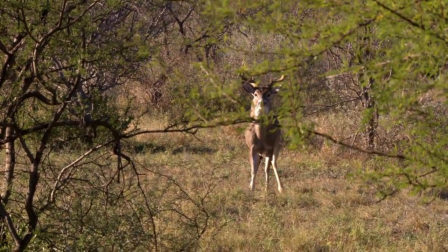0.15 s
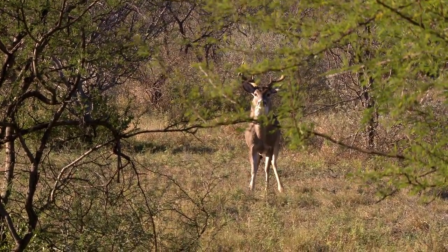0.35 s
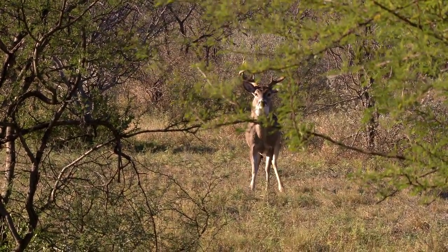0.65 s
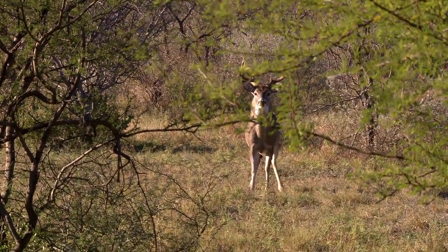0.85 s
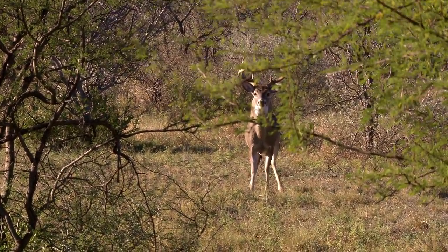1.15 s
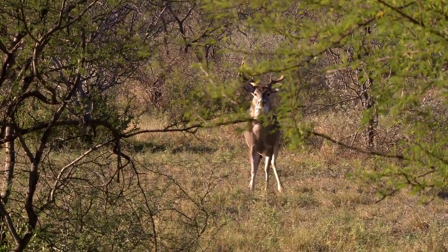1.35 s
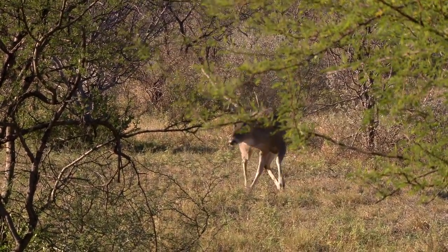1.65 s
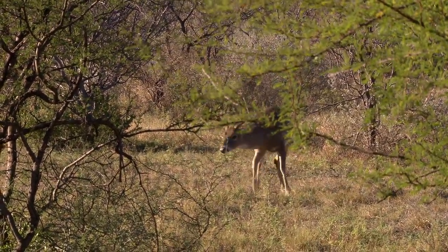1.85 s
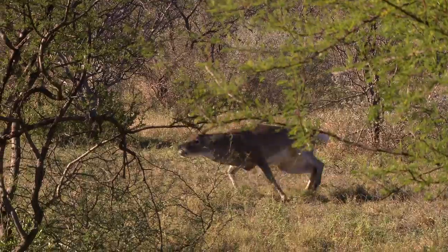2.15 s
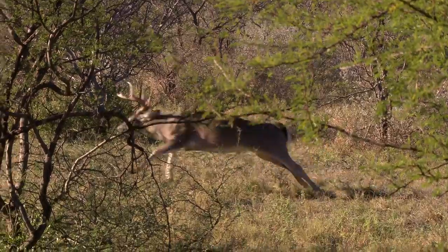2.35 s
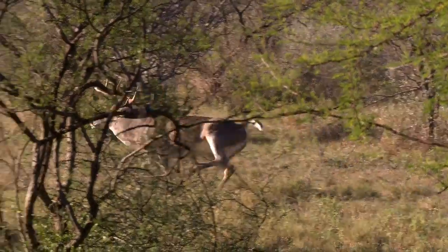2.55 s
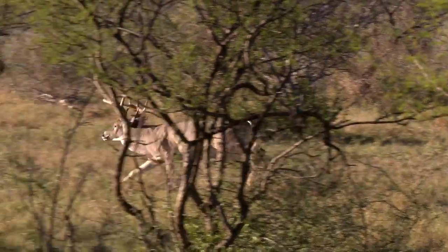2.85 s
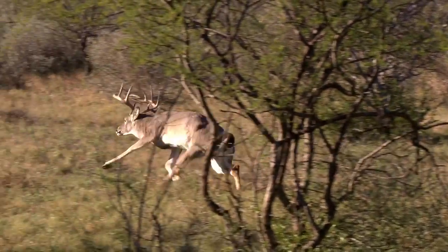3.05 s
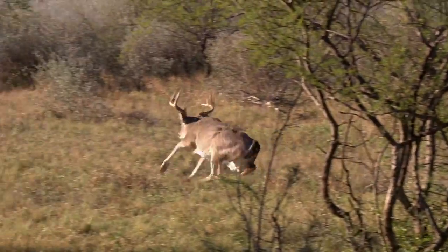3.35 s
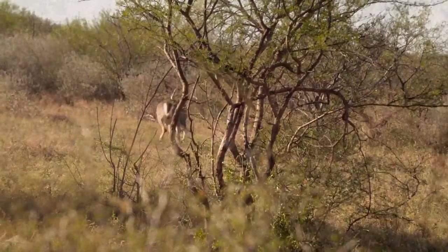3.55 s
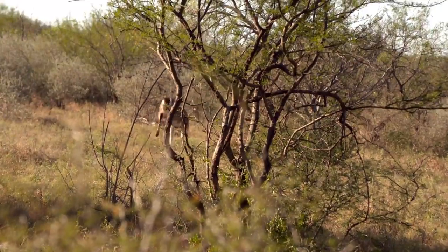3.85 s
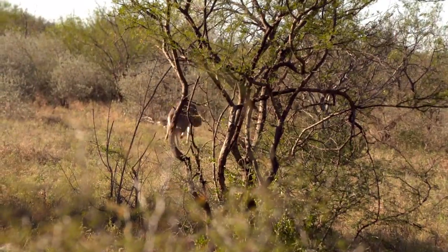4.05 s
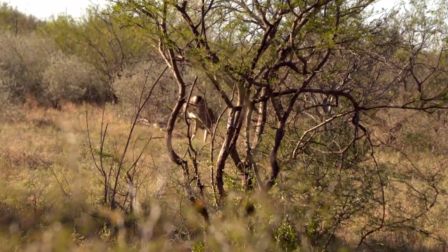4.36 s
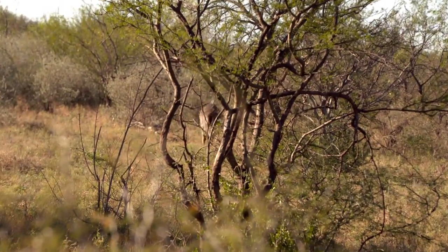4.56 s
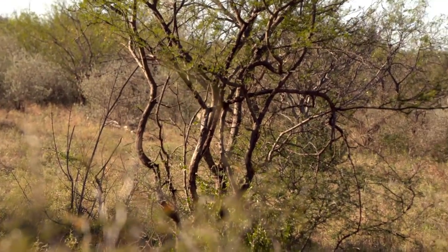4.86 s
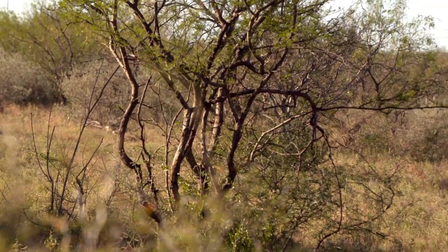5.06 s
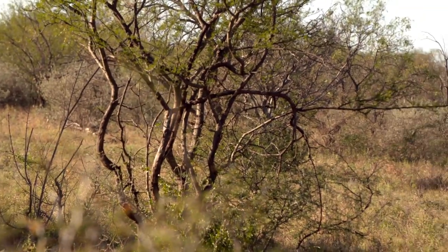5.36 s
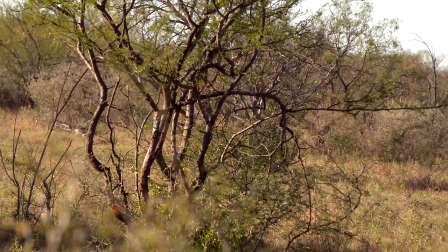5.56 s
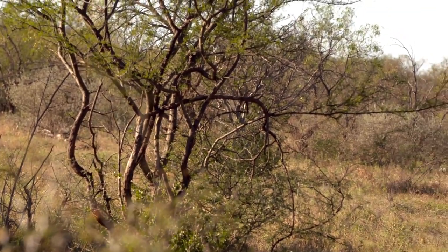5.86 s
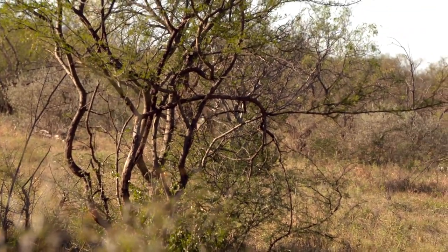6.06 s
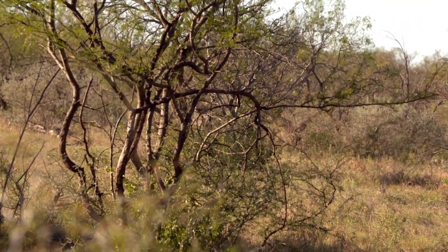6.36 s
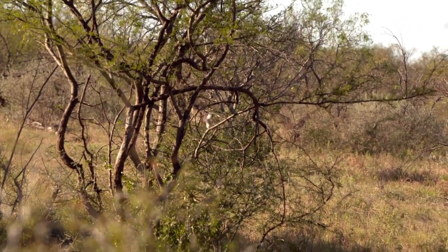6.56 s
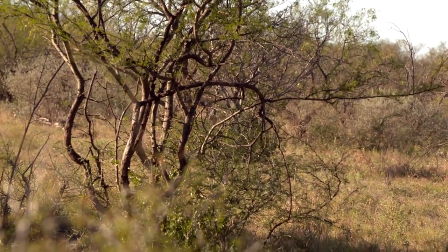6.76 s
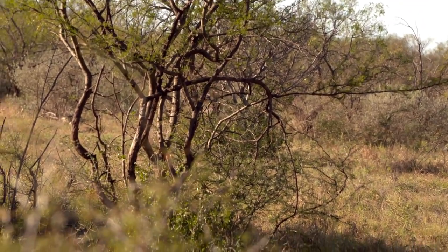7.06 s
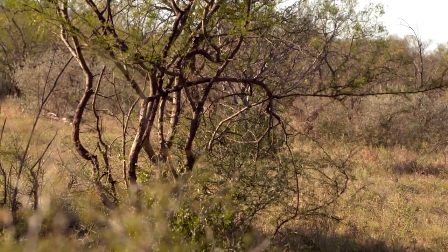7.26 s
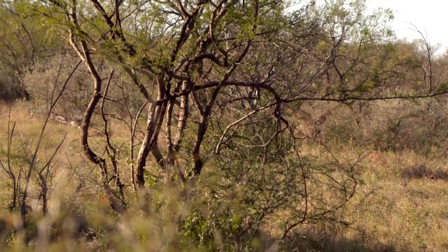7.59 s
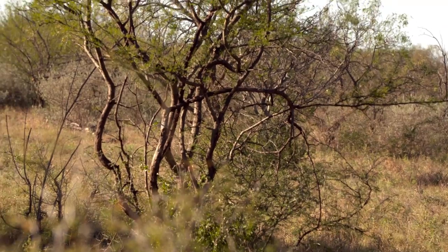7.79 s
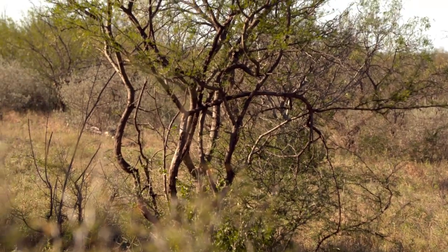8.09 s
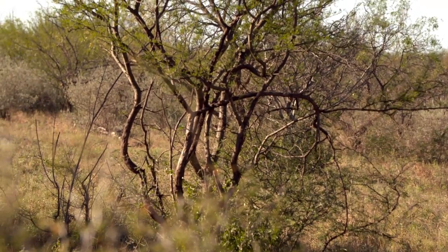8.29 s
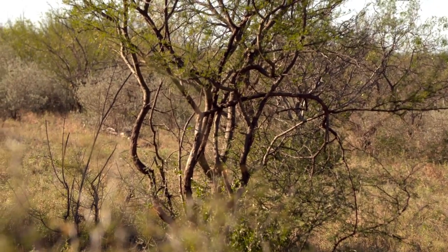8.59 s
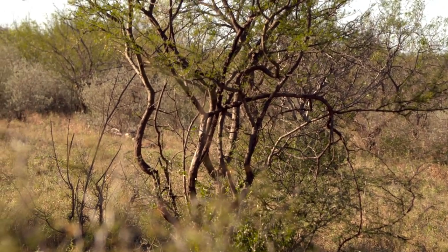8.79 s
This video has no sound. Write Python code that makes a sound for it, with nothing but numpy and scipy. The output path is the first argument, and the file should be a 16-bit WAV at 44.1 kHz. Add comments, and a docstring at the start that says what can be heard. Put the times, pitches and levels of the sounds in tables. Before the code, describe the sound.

Outdoors in quiet brush country, antler tines clack together several times a second, some strokes bright and clicking, others lower and woody, with the hardest slightly overloading the microphone. An early pop and momentary gap lead into a rushing, thudding brush of twigs that quickly dies away. More uneven clatter and small rubs follow, with faint wind and grass beneath.

```python
"""A pair of antlers is rattled by hand close to a microphone in dry brush, over faint wind and rustling grass.
The opening 0.435 s is a copy of knocks heard again from 4.6 s; a short splice joins it to the rattling.
At 1.39 s the signal drops out with a pop; as it returns, a thumping swipe through the brush dies away.
Until 8.9 s tines knock, chatter and scrape: impulses and slips excite decaying modes, some knocks leave
a beam humming, and the hardest overload the input. Shaped noise makes the swipe, wind and grass."""
import sys
import numpy as np
from scipy import signal
from scipy.io import wavfile
from scipy.ndimage import uniform_filter1d

SR = 44100
rng = np.random.default_rng(int(sys.argv[2]) if len(sys.argv) > 2 else 0)


def generate_wav(signal):
    """Clip the signal to [-1, 1] and save it as 16-bit WAV at the path in sys.argv[1]."""
    frames = np.transpose(np.atleast_2d(signal))
    scaled = np.clip(frames, -1, 1) * 32767
    pcm = np.round(scaled).astype(np.int16)
    wavfile.write(sys.argv[1], SR, pcm)


N = 393813

DROP_S, BACK_S = 1.3864, 1.451  # the signal is lost between these times


def gain_of(db):
    """Level in dB as an amplitude ratio: 20 dB is a factor of ten."""
    return 10 ** (np.asarray(db) / 20)


def evened(x):
    """Normalization to unit root-mean-square."""
    return x / np.sqrt(np.mean(x ** 2) + 1e-20)


def read(points, hz):
    """Interpolation of a spectral curve along a logarithmic frequency axis."""
    f, value = np.transpose(points)
    return np.interp(np.log(hz + 1), np.log(f + 1), value)


def add(mix, s, sound):
    """Superposition of a sound on the mix from time s."""
    part = mix[round(s * SR):][:len(sound)]
    part += sound[:len(part)]


def noise(colour, patchy_db, flicker_db):
    """Random-phase spectral synthesis: coloured noise with drifting patches and a flicker shared by all bands."""
    frames, hz = N // 128 + 5, np.fft.rfftfreq(512, 1 / SR)
    real, imaginary, patches = rng.standard_normal((frames, 257, 3)).T
    patches = uniform_filter1d(patches, size=8, axis=0)  # over frequency
    patches = evened(uniform_filter1d(patches, size=16, axis=1))  # over time
    flicker = evened(uniform_filter1d(rng.standard_normal(frames), size=3))
    level_db = patchy_db * patches + flicker_db * flicker
    spectrum = (real + 1j * imaginary) * gain_of(read(colour, hz)[:, None] + level_db)
    return evened(signal.istft(spectrum, nperseg=512, noverlap=384)[1][:N])


def knocks(first_contact=1.3, softness=.55, crack_size=24):
    """Impact excitation: a firm first contact and a few milliseconds of chatter drive the antler modes."""
    # each knock of tine on tine: t/s, level/dB over its first 6 ms, treble tilt/(dB per octave), favoured ring f/Hz
    blows = [(0.62, -25, 2.5, 3470), (.631, -16.5, 1.5, 2030), (.652, -33, -5, 1310), (.663, -39, -2, 1030),
             (.683, -25.5, 3.5, 2540), (.748, -46.5, -9, 1540), (.807, -38.5, 0, 1750),
             (.816, -36, -2, 2340), (.859, -60, -11, 2870), (.888, -50, -5, 1910), (1.021, -20.5, 1, 3150),
             (1.031, -30, -4, 2570), (1.052, -39, 1, 1190), (1.072, -28.5, -2.5, 2700),
             (1.123, -31, 3, 2300), (1.163, -34.5, 1.5, 3600), (1.325, -35.5, 0, 1403),
             (1.332, -18.5, 3.5, 2220), (1.376, -42, -6.5, 1270), (1.578, -26.5, 1, 3280),
             (1.604, -26.5, 2.5, 1100), (1.614, -20, 3, 1350), (1.641, -42.5, -1, 1030),
             (1.787, -52, -7, 1810), (1.84, -33.5, 6, 1797), (1.896, -33, 1.5, 1340), (1.911, -18, 2, 1410),
             (2.174, -20.5, 4.5, 2085), (2.186, -25, -1.5, 1540), (2.208, -31.5, 2, 1510),
             (2.231, -45, -5.5, 1680), (2.325, -58, 9, 3150), (2.346, -43, 1.5, 1810),
             (2.359, -46.5, 7.5, 4930), (2.428, -21, 5, 3030), (2.468, -15, 3.5, 1930),
             (2.49, -29, -4, 1290), (2.495, -35, -5, 1190), (2.525, -47.5, -8, 1680),
             (2.575, -55.5, -1.5, 1560), (2.587, -52.5, -8, 1870), (2.701, -28, 5, 2820),
             (2.705, -21.5, 6.5, 2950), (2.715, -17.5, 6, 1370), (2.743, -36.5, 12, 1560),
             (2.984, -42.5, 1.5, 960), (3.003, -32, -2.5, 1530), (3.013, -18.5, -0.5, 1860),
             (3.029, -35, 2, 1700), (3.255, -24, 4, 980), (3.297, -21, 2, 1540), (3.309, -25.5, -0.5, 1220),
             (3.536, -40.5, 0, 3550), (3.744, -19.5, 2.5, 3260), (3.769, -16.5, 0, 3170),
             (3.802, -35.5, 0.5, 2300), (3.968, -28.5, 2.5, 1130), (3.98, -33.5, 2.5, 1330),
             (4.03, -27, 1.5, 1270), (4.051, -47, 8, 1180), (4.084, -30, 7.5, 2870), (4.099, -21, 4, 2030),
             (4.202, -37.5, 0, 3280), (4.334, -29, 2, 3330), (4.351, -21, 4, 2180),
             (4.36, -28.5, -2.5, 1830), (4.393, -41.5, -3.5, 2420), (4.445, -53.5, -4.5, 1407),
             (4.564, -35, 0, 3460), (4.586, -24.5, 5, 3360), (4.601, -26, -5.5, 3300), (4.61, -31, 0, 1310),
             (4.624, -24.5, 0.5, 1500), (4.647, -27.5, -3.5, 3260), (4.683, -36, 0, 1630),
             (4.7, -32.5, 3, 2620), (4.724, -49, 0, 3400), (4.738, -51, 10, 3380), (4.763, -32.5, 4, 3200),
             (4.869, -30, 8, 1200), (4.899, -22.5, 9.5, 3000), (4.908, -20.5, -2.5, 1380),
             (4.918, -21, 2.5, 1550), (4.946, -31, -3.5, 1180), (4.96, -43.5, -16, 1270),
             (4.992, -51, 3, 1180), (5.018, -38.5, -4.5, 1500), (5.226, -43, -1.5, 1460),
             (5.249, -24, 2, 4230), (5.287, -23.5, 2, 2430), (5.326, -36, -1.5, 3350),
             (5.345, -44.5, 1.5, 2250), (5.467, -26.5, 3, 5500), (5.483, -22, 1.5, 1890),
             (5.497, -30, -1, 1510), (5.509, -31.5, 1.5, 1480), (5.565, -53.5, -3, 1210),
             (5.598, -38.5, -2, 3250), (5.725, -21.5, 8.5, 3060), (5.739, -21.5, 3, 1800),
             (5.754, -31.5, -2, 1590), (5.816, -40, 1, 1390), (5.857, -45.5, 2.5, 3900),
             (5.903, -37.5, 3, 3460), (6.001, -33, 7, 3640), (6.016, -36.5, 5, 3940),
             (6.024, -24.5, 6.5, 4200), (6.147, -61, 6, 960), (6.339, -26, 2, 1000),
             (6.362, -21.5, -.5, 3300), (6.39, -41, -3.5, 1190), (6.457, -45, -1, 2450),
             (6.647, -29.5, 2.5, 2860), (6.659, -33.5, 2.5, 2660), (6.677, -33.5, 4, 1200),
             (6.685, -27, 1, 4030), (6.693, -23, 1, 1100), (6.718, -40.5, -1, 1070), (6.728, -37, -2, 3420),
             (6.864, -57.5, -5, 1215), (6.926, -33.5, 2.5, 3400), (6.95, -42.5, -1.5, 3100),
             (7.05, -27.5, 5, 4170), (7.063, -28, 3, 3660), (7.086, -35, 3.5, 2720),
             (7.111, -27.5, 6.5, 1080), (7.119, -21.5, 0, 2950), (7.197, -36.5, 0.5, 3300),
             (7.252, -35.5, -1, 2800), (7.293, -63, -6, 1420), (7.315, -59.5, -2, 1460),
             (7.402, -31, 7.5, 3900), (7.42, -27.5, 3.5, 3680), (7.428, -28, 1, 1660),
             (7.442, -22.5, 1, 1240), (7.478, -45, 0, 1870), (7.554, -55.5, -3, 1530),
             (7.618, -33.5, -1.5, 3270), (7.693, -31, -4, 960), (7.716, -36, 0, 1480),
             (7.759, -42.5, 5.5, 2960), (7.768, -39, 0, 2890), (7.781, -23.5, 2, 3650),
             (7.791, -31.5, -10, 1480), (7.872, -44.5, -7.5, 2180), (7.902, -26.5, 4, 1270),
             (8.067, -21.5, 2, 4040), (8.092, -21, 0.5, 2950), (8.114, -33.5, 4, 1490),
             (8.131, -41, -5, 1200), (8.174, -34, -1.5, 2530), (8.218, -41.5, 10.5, 2840),
             (8.291, -35, 5.5, 2470), (8.33, -27.5, 5.5, 3500), (8.367, -31.5, -1, 3500),
             (8.373, -24, 4, 1670), (8.398, -36, -1, 1490), (8.41, -43.5, -7, 1510),
             (8.463, -28.5, 4, 3700), (8.522, -46.5, -4, 3570), (8.688, -25, 2, 3160),
             (8.804, -21.5, 6.5, 3970), (8.824, -28, 6, 3530), (8.833, -24, 4, 3100),
             (8.92, -54.5, -4, 1510)]
    times, levels_db, bright, ring_hz = np.transpose(blows)
    # the decay time constant of the chatter grows for knocks harder than firm
    chatter_ms, chatter_ms_per_db, firm_db = 3.48, 0.31, -26.5
    decay_ms = chatter_ms + chatter_ms_per_db * np.maximum(levels_db - firm_db, 0)
    contact = rng.standard_normal((len(times), 1200))
    ms = 1000 * np.arange(contact.shape[1]) / SR
    bounces = contact ** 3 / 4 * np.exp(-ms / np.maximum(decay_ms, .05)[:, None])  # the cube makes them sparse
    bounces = signal.lfilter([1 - softness], [1, -softness], bounces)  # later contacts are softer, so duller
    bounces[:, :crack_size] += first_contact * contact[:, -crack_size:]  # the first one cracks
    sounds = signal.fftconvolve(rings(bright, ring_hz), bounces, axes=1)
    out = np.zeros(N)
    for s, db, sound in zip(times, levels_db, sounds):
        onset_rms = np.sqrt(np.mean(sound[:260] ** 2))  # first 6 ms
        add(out, s, gain_of(db) * sound / onset_rms)
    return out


def rings(bright, ring_hz, spread_db=3.0, small_db=-4.0, place_db=9.5, place_octaves=0.1, grip_db_per_s=402.0):
    """Modal superposition: all blows share the same modes, and the place of each blow sets their mix."""
    # main modes of the antlers: f/Hz, relative level/dB, t60/s before the grip damps them
    main_modes = [(405.5, -13, 0.16), (1009.5, -1, 0.1), (1211.4, -2.5, 0.082), (1267, -4, 0.063),
                  (1504.6, 0.5, 0.077), (1620, -7, .07), (2255, -2.5, 0.059), (2340, -9, 0.032),
                  (2870, -21.5, 0.022), (3271, -1, 0.043), (3480, -6, 0.053), (3870, -3, 0.029),
                  (4040, -13.5, 0.041), (5430, -8.5, 0.034), (6900, -12, 0.047), (11160, -21.5, 0.03)]
    # crowd of small modes between them: f/Hz, relative level/dB
    small_levels = [(250, -43), (680, -21.5), (1140, -7.5), (2000, -4), (3250, -4), (5800, -5.5),
                    (8300, -12.5), (12800, -10), (16500, -33.5)]
    # decay of the small modes: f/Hz, t60/s before the grip damps them
    small_decays = [(300, 0.16), (1200, 0.064), (3500, 0.029), (7000, 0.011), (16000, 0.01)]
    main_hz, main_db, main_t60 = np.transpose(main_modes)
    small_hz = np.geomspace(small_levels[0][0], small_levels[-1][0], num=240) * rng.uniform(1.0, 1.01, size=240)
    hz = np.r_[main_hz, small_hz]
    base_db = np.r_[main_db, read(small_levels, small_hz) + small_db]
    t60 = np.r_[main_t60, read(small_decays, small_hz)]
    t = np.arange(6000) / SR
    decay = gain_of(-60 * t / t60[:, None])
    fade = np.cos(np.pi / 2 * t / t[-1])
    modes = decay * np.sin(2 * np.pi * hz[:, None] * t) * fade
    size, sign = rng.standard_normal((len(bright), len(hz), 2)).T
    # a hard glancing blow tips the mix to the treble; modes near the struck tine's pitch stand out
    tilt_db = bright * np.clip(np.log2(hz[:, None] / 2800), -1.2, 1.5)
    struck_db = place_db * np.exp(-.5 * (np.log2(hz[:, None] / ring_hz) / place_octaves) ** 2)
    mode_gain = np.sign(sign) * gain_of(base_db[:, None] + tilt_db + struck_db + spread_db * size)
    ringing = mode_gain.T @ modes
    ringing *= 1 + 1.4 * np.exp(-t / 0.0022)  # the blow itself is heard before the ring settles
    # the hands grip more or less tightly and damp the ring
    grip = rng.random((len(bright), 1)) ** 2
    return ringing * gain_of(-grip_db_per_s * grip * t)


def rubs(slips_per_s=1100, grit_db=4, places=3):
    """Stick-slip friction: grinding tines slip in dense tiny ticks that ring the antlers from a sliding contact."""
    # tines grinding along each other: start t/s, length t/s between edges, first level/dB, last level/dB,
    # favoured ring f/Hz
    strokes = [(0.715, 0.051, -57, -58, 1500), (.815, 0.096, -54, -57, 3160),
               (1.046, 0.042, -50.5, -42, 1300), (2.501, 0.051, -54, -75, 1515),
               (2.751, 0.074, -56, -58, 1596), (5.039, 0.082, -66, -61.5, 3360),
               (5.198, 0.054, -59, -46, 3200), (4.699, 0.04, -50, -52.5, 3360),
               (7.701, .185, -43, -68.5, 1370), (8.474, 0.043, -45.5, -53, 1500),
               (8.537, 0.095, -41.5, -56.5, 2450)]
    edge_s = .012  # a stroke sets in before its start and lifts off after its end this fast
    pressure_db, slide_s = 2.5, .02  # rms wavering of pressure; time before the contact slides to the next place
    size_db = grit_db * np.minimum(rng.exponential(size=N), 3.5)
    size_db += pressure_db * evened(uniform_filter1d(rng.standard_normal(N), size=500))
    slipping = rng.random(N) < slips_per_s / SR
    slips = evened(rng.choice([-1., 1.], N) * gain_of(size_db) * slipping)
    ring_hz = np.repeat(np.array(strokes)[:, -1], places)
    bodies = rings(np.full(len(ring_hz), -4.5), ring_hz, spread_db=3.5, small_db=2.0)
    bodies = bodies.reshape(len(strokes), places, -1)
    t, out = np.arange(N) / SR, np.zeros(N)
    place = (t // slide_s) % places
    for (s, length, first_db, last_db, _), body in zip(strokes, bodies):
        touch = np.clip(np.minimum(t - s, s + length - t) / edge_s + 1, 0, 1)
        drive = slips * touch * gain_of(np.interp(t, [s, s + length], [first_db, last_db]))
        for k in range(places):
            response = body[k] / np.linalg.norm(body[k])
            out += signal.oaconvolve(drive * (place == k), response)[:N]
    return out


def hums(t60=0.4):
    """Free damped vibration: the thick beams ring on at a low pitch."""
    # knocks that leave a main beam humming: t/s, level/dB ahead of the gradual onset, beam f/Hz
    beams = [(.63, -57, 354.4), (1.91, -55, 549), (2.174, -65, 362), (3.013, -59.5, 547), (3.3, -68.5, 554),
             (4.349, -53.5, 354), (4.765, -60, 351), (5.017, -66.5, 363), (6.927, -57, 562),
             (7.618, -65, 360), (7.903, -53, 544)]
    out, t = np.zeros(N), np.arange(14000) / SR
    for s, db, hz in beams:
        onset = 1 - np.exp(-t / 0.0036)
        add(out, s, gain_of(db - 60 * t / t60) * np.sin(2 * np.pi * hz * t) * onset)
    return out


def stroke(rows):
    """Amplitude modulation: the smoothed gain curve of one stroke, at -140 dB outside it."""
    s, db = np.transpose(rows)
    return uniform_filter1d(gain_of(np.interp(np.arange(N) / SR, s, db, -140, -140)), size=100)


def swipe():
    """Dense random contacts: a rush of twigs and leaves as enveloped, coloured noise."""
    # a swipe through the brush that dies away: t/s, level/dB
    envelope = [(1.45, -40.5), (1.485, -32.5), (1.497, -25.5), (1.515, -40.5), (1.55, -42.5), (1.6, -50),
                (1.65, -47.5), (1.67, -55.5), (1.95, -75.5)]
    # its colour: f/Hz, relative level/dB per Hz
    colour = [(35, -45), (60, -37), (164, -15.5), (682, -7), (1090, -4), (1860, -7.5), (2840, -9),
              (12700, -38.5), (16000, -39)]
    return stroke(envelope) * noise(colour, patchy_db=1.2, flicker_db=2.2)


def thumps():
    """Heavily damped oscillation: a few dull cycles for each push."""
    # low pushes inside the swipe: t/s, starting level/dB, f/Hz
    pushes = [(1.492, -26, 186), (1.498, -20, 265)]
    out, t = np.zeros(N), np.arange(1500) / SR
    for s, db, hz in pushes:
        add(out, s, gain_of(db - 60 * t / 0.022) * np.sin(2 * np.pi * hz * t))
    return out


def brush(x, t60=0.12):
    """Multiple scattering: weak echoes from stems and ground as a sparse decaying impulse response."""
    t = np.arange(8000) / SR
    sparse = rng.random(len(t)) < .05
    taps = rng.standard_normal(len(t)) * sparse * gain_of(-60 * t / t60) * (t > .004)
    taps = signal.lfilter([1], [1, -.6], taps)  # dulls the echoes
    return signal.oaconvolve(x, taps / np.linalg.norm(taps))[:N]


def air():
    """Broadband random sources: low rumble of wind and swipe, and dry rustle that loses its top when faint."""
    # t/s, low rumble level/dB: wind, and from 1.39 to 1.96 s the low part of the swipe,
    # dry rustle level/dB before its top is lost
    levels = [(.45, -79, -78), (0.972, -80, -84), (1.391, -75, -88), (1.51, -40.5, -56),
              (1.79, -62.5, -94.5), (1.961, -72, -76.5), (2.59, -71.5, -75.5), (3.031, -78, -80.5),
              (3.8, -78, -84), (4.85, -77, -84.5), (5.172, -63.5, -71.5), (5.59, -69, -76),
              (5.89, -52.5, -61.5), (6.12, -59, -69), (7.51, -67, -76), (8.129, -61.5, -71.5),
              (8.93, -61, -71)]
    # colour of the rumble: f/Hz, relative level/dB per Hz
    rumble_colour = [(30, -28), (60, -26), (150, -8), (330, -2), (600, -7), (1000, -12), (2500, -26.5),
                     (4000, -59)]
    # colour of the rustle: f/Hz, relative level/dB per Hz
    rustle_colour = [(880, -26), (1500, -1), (3400, -5.5), (5000, -7), (9400, -7.5), (14500, -13),
                     (16000, -25.5)]
    s, rumble_db, rustle_db = np.transpose(levels)
    t = np.arange(N) / SR
    rumble = gain_of(np.interp(t, s, rumble_db)) * noise(rumble_colour, patchy_db=4.0, flicker_db=1.5)
    rustle = noise(rustle_colour, patchy_db=.7, flicker_db=1.2)
    level_db = np.interp(t, s, rustle_db)
    dull = signal.sosfiltfilt(signal.butter(4, 8200, fs=SR, output="sos"), rustle)
    near = np.clip((level_db + 80.0) / 10, 0, 1)  # dull at -80 dB, full at -70 dB
    return rumble + gain_of(level_db) * (near * rustle + (1 - near) * dull)


def pop():
    """Transient response: the line flicks down, holds high, flips low and swings back through zero to rest."""
    flick_ms, high_ms, flip_ms, low_ms = .1, 1.1, .5, 2.0
    zero_ms, settle_ms = 1.9, 1.5  # after the low hold: time to cross zero, and decay time constant
    height = .83  # relative to the overload level
    ms = 1000 * (np.arange(N) / SR - DROP_S)
    corners = np.cumsum([0, flick_ms, high_ms, flip_ms])
    after = np.maximum(ms - corners[-1] - low_ms, 0)
    jolt = np.interp(ms, corners, [-1, 1, 1, -1], 0)
    return height * jolt * (1 - after / zero_ms) * np.exp(-after / settle_ms)


def scene():
    """Linear superposition of all sources; thin tines radiate little bass, hence the high-pass."""
    low_cut = signal.butter(2, 340, "high", fs=SR, output="sos")  # Hz
    antlers = signal.sosfilt(low_cut, knocks() + rubs())
    echoes = gain_of(-27.5) * brush(antlers)
    return (antlers + echoes + hums() + swipe() + thumps() + air())[None]


def record(dry):
    """Nonlinear saturation of the input, then the spliced opening, the dropout with its pop and a band limit."""
    overload_db, edge_hz = -16, 16700
    replay_s, join_s, join_fade_s = 4.6046, .435, .02  # up to join_s one hears the stretch that starts at replay_s
    top, t = gain_of(overload_db), np.arange(N) / SR
    x = dry / top
    clipped = top * x / (1 + x ** 6) ** (1 / 6)
    join = np.pi / 2 * np.clip((t - join_s) / join_fade_s, 0, 1)  # equal-power crossfade
    opening = np.roll(clipped, -round(replay_s * SR), axis=1)
    spliced = np.sin(join) * clipped + np.cos(join) * opening
    live = np.interp(t, [DROP_S - 1 / SR, DROP_S, BACK_S, BACK_S + 0.005], [1, 0, 0, 1])
    line = live * spliced + top * pop()
    band_limit = signal.firwin(511, edge_hz, window=("kaiser", 9), fs=SR)
    return signal.oaconvolve(line, band_limit[None], "same")


dry = scene()
out = record(dry)
generate_wav(out)
```